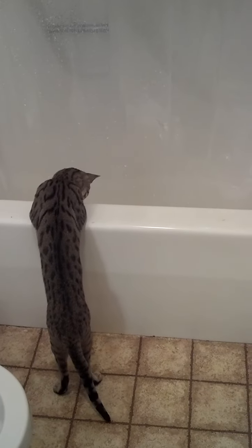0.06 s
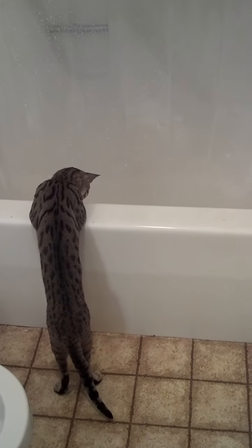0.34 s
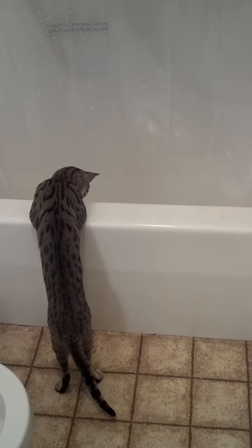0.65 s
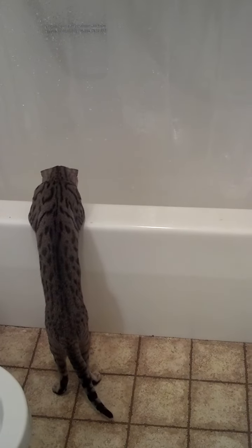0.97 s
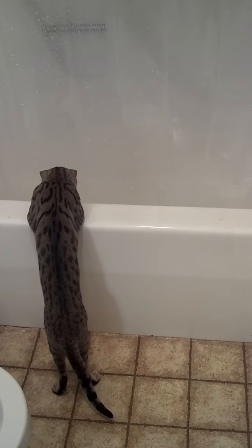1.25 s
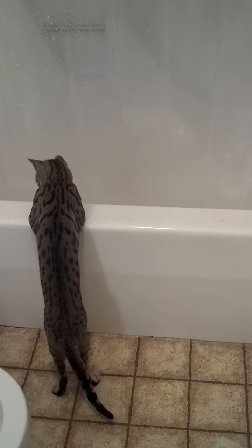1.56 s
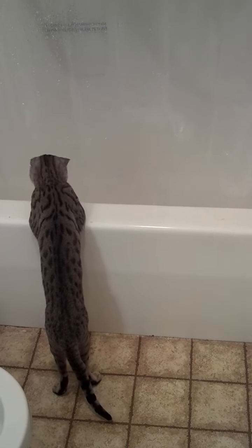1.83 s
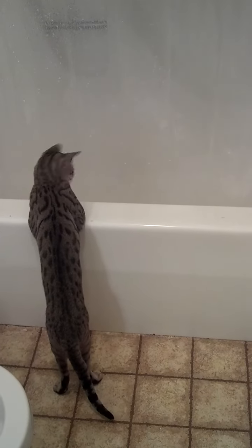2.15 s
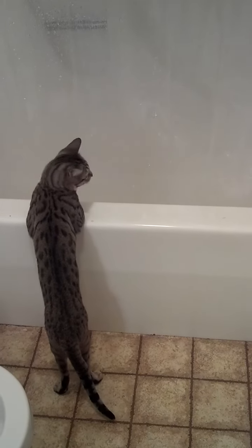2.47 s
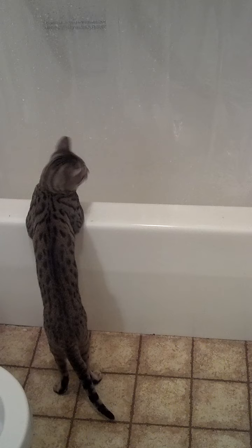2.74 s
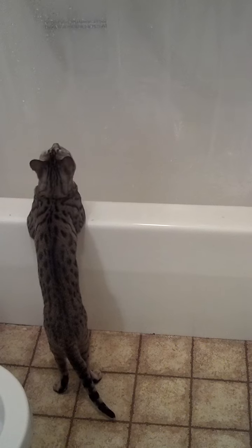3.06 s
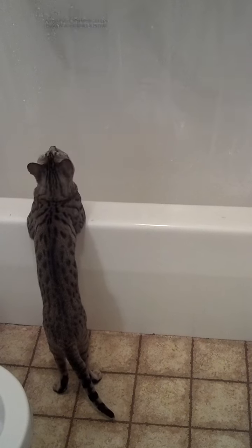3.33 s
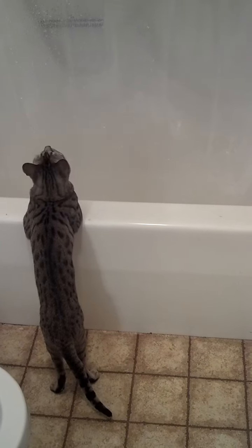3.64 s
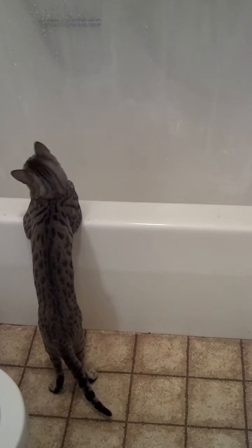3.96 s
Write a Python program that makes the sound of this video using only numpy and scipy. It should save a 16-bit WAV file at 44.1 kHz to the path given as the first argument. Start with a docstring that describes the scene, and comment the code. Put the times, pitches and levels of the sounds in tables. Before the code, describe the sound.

A shower runs into a bathtub for the whole four seconds, a bright, slightly wavering hiss over the patter and low drumming of drops. Brief, light splashes come irregularly from about 0.4 seconds on. Heavier dollops land with soft hollow thuds from about 0.8 seconds, strongest between 1.8 and 2.6 seconds. The tub and small tiled bathroom add a short, low ring.

```python
"""A shower runs into a tub in a small tiled bathroom. Its drops strike at random, a shot noise that
hisses and patters as the stream shifts. Now and then water slaps down or a heavier dollop drums the
tub floor, and the impacts drive the low resonances of tub and room. A phone hears it all through
two microphone ports and widens the stereo image."""
import sys
import numpy as np
from scipy import signal
from scipy.fft import rfft, irfft
from scipy.io import wavfile
from scipy.ndimage import uniform_filter1d

SR = 44100
rng = np.random.default_rng(int(sys.argv[2]) if len(sys.argv) > 2 else 0)


def digitize_waveform(pressure):
    """Quantize a signal to 16-bit integers and store it at the path in sys.argv[1].

    Rows of a 2-D input are taken as channels; values are limited to [-1, 1].
    """
    field = np.atleast_2d(pressure).T
    bounded = np.clip(field, -1, 1)
    quanta = np.round(bounded * 32767).astype(np.int16)
    wavfile.write(sys.argv[1], SR, quanta)


N = 176400
FLICKER_HZ = 50.65


def spray(mist_share=0.4):
    """Shot noise: fine drops tick in a mist so dense that it merges into a Gaussian hiss."""
    # spectrum of the hiss: f/Hz, level/dB
    hiss_spectrum = [(600,-100),(1900,-84),(2400,-82.3),(3300,-79.7),(4100,-82),(4900,-78.8),(5700,-80.2),(6900,-79.5),(8400,-77.5),(9600,-78.1),(11000,-77.2),(12400,-75.6),(14000,-73.3),(14600,-72.8),(15200,-69.5)]
    ticks = tiles(drops(per_s=5000, spread_db=1))
    mist = rng.standard_normal((2, N))
    hiss = np.sqrt(1 - mist_share) * ticks + np.sqrt(mist_share) * mist
    return colour(hiss * flow(follow=0.85, column=2) * flicker(depth_db=1.17), hiss_spectrum)


def tub(per_s=2500, spread_db=1.5):
    """Impact excitation: larger drops patter on the tub and drum its floor; dollops thud and scatter."""
    # spectrum of the patter: f/Hz, level/dB
    patter_spectrum = [(150,-87),(400,-79.5),(650,-78.5),(1000,-77.5),(1150,-82),(1430,-76),(1630,-78.5),(1850,-80.5),(2600,-130),(5000,-105),(16000,-120)]
    # spectrum of the drumming floor: f/Hz, level/dB
    drum_spectrum = [(25,-103),(70,-102),(98,-76.5),(130,-77.5),(200,-75.5),(300,-73),(355,-74.5),(440,-72),(520,-78),(750,-89.5),(1200,-101),(3000,-120)]
    patter = tiles(drops(per_s, spread_db)) * flow(follow=1.05, column=1) * flicker(depth_db=0.5)
    drum = drops(per_s, spread_db) * flow(follow=1, column=1)
    steady = colour(patter, patter_spectrum) + colour(drum, drum_spectrum)
    return resonate(steady + dollops(per_s, spread_db))


def dollops(per_s, spread_db):
    """Impulse response: each dollop gives the tub floor one push, a hollow thud, and scatters drops."""
    # landings: t/s, level/dB
    landings = [(.765,2.5),(0.864,4),(.98,2),(1.19,2),(1.289,0),(1.8,5.5),(1.989,4.5),(2.196,8),(2.595,5),(2.825,2.5),(3.165,4),(3.57,-10),(3.93,-1.5)]
    # spectrum of the thud: f/Hz, level/dB
    thud_spectrum = [(250,-110),(350,-93),(450,-89),(540,-112),(1000,-150)]
    # spectrum of the scattered drops: f/Hz, level/dB
    scatter_spectrum = [(60,-102),(160,-82.5),(280,-84),(370,-81),(450,-72),(540,-87.5),(800,-84),(1400,-99.5),(2200,-77),(5000,-120)]
    pushes = np.zeros(N)
    for start, db in landings:
        pushes[int(start * SR)] += undb(db) * np.sqrt(SR)
    scatter = drops(per_s, spread_db) * bursts(landings, attack_s=0.0072, decay_s=0.088)
    return colour(scatter, scatter_spectrum) + colour(pushes, thud_spectrum)


def splashes():
    """Transient shot noise: each slap of water throws up a short, dense shower of droplets."""
    # slaps: t/s, level/dB
    slaps = [(.397,-9),(.458,-2),(.65,-6.5),(.782,-13),(.95,-5.5),(1.217,-4.5),(1.585,-11),(1.803,-19),(2.142,-7),(2.382,-7.5),(2.547,-8),(2.712,-4),(3.172,-12),(3.42,-4.5),(3.732,-21),(3.902,-4.5)]
    # bright spectrum of the droplets: f/Hz, level/dB
    splash_spectrum = [(500,-84),(2000,-124),(5000,-70),(8000,-68.5),(11000,-70.5),(15500,-78)]
    droplets = drops(per_s=12000, spread_db=-3.5) * bursts(slaps, attack_s=0.0049, decay_s=0.027)
    return colour(tiles(droplets), splash_spectrum)


def drops(per_s, spread_db):
    """Poisson impacts, exponentially distributed in level: two independent streams of unit power."""
    hit = rng.random((2, N)) < per_s / SR
    size = undb(spread_db * np.minimum(rng.exponential(size=(2, N)), 5))
    impacts = hit * size * np.sign(rng.standard_normal((2, N)))
    return impacts / impacts.std()


def flow(follow, column):
    """Slow amplitude modulation by the shifting stream; follow scales its swing in dB."""
    # strength of the falling water: t/s, patter level/dB, hiss level/dB
    strength = [(0.0, -2, -3), (0.12, -2.3, -5), (0.25, 0.5, -2), (0.35, -0.5, -3.5), (0.42, -0.5, -1),
                (0.58, -1, -2.5), (0.71, 0.5, -3), (0.76, 2.5, -1), (0.98, 1, 0), (1.08, 1, -2.5),
                (1.34, 2.5, 0), (1.45, -1, -3), (1.58, -0.5, -1.5), (1.72, -0.5, -3.5), (1.81, 0.5, -1),
                (1.86, -3.5, -4.5), (1.91, 1, -0.5), (2.08, -1.5, -3.5), (2.22, 1, -1.5), (2.38, -1.5, -2),
                (2.43, -2.5, -5.5), (2.5, 0, -1.5), (2.64, -1, -4), (2.75, -0.5, -0.5), (2.88, -0.5, -2.5),
                (3.16, -0.5, -1), (3.26, -0.5, -4), (3.38, -0.5, -2.5), (3.45, 0.9, -1), (3.58, 2, -0.5),
                (3.66, 1.5, -1.5), (3.72, 0, -0.5), (3.78, -2.5, -6), (4.0, -1.5, -2)]
    rows = np.array(strength)
    return undb(follow * np.interp(times(), rows[:, 0], rows[:, column]))


def flicker(depth_db):
    """Fast amplitude modulation: the level glides between random values, depth_db in RMS."""
    hold = int(SR / FLICKER_HZ)
    steps = rng.standard_normal(N)[np.arange(N) // hold]
    glide = uniform_filter1d(steps, hold)
    return undb(depth_db * glide / glide.std())


def bursts(events, attack_s, decay_s):
    """Incoherent summation: envelopes of linear rise and exponential decay add in power."""
    power = np.zeros(N)
    for start, db in events:
        age = np.maximum(times() - start, 0)
        rise = np.minimum(age / attack_s, 1)
        fall = np.exp(-np.maximum(age - attack_s, 0) / decay_s)
        power += (undb(db) * rise * fall) ** 2
    return np.sqrt(power)


def resonate(x):
    """Modal resonance: a minimum-phase filter rings with one Lorentzian peak for each mode."""
    # modes of tub and room: f/Hz, bandwidth/Hz, boost/dB (sign ignored)
    modes = [(101.4,6,7.5),(167.4,13,11.5),(218,6,2.5),(237.3,9.9,10),(303,8,3),(354.8,6.9,8.5),(387.3,20,7.5),(436,4.3,5.5),(450.6,10.5,9),(554,23,2.5),(570,18,5.5),(637.5,17,7.5),(726.5,15,7),(816.5,13.4,7),(922,19,3.5),(995.6,9.9,6.5),(1120,17,6),(1202,27,6.5),(1278,4.7,5.5),(1345,12,7),(1420,27,2.5),(1603,8.2,7),(1670,8,6),(1803,12,-0.5)]
    power = 1 + sum((undb(abs(db)) ** 2 - 1) / (1 + (2 * (bins() - hz) / width) ** 2)
                    for hz, width, db in modes)
    cepstrum = irfft(np.log(power), N)
    causal = np.concatenate([cepstrum[:1] / 2, cepstrum[1:N // 2]])
    return irfft(rfft(x) * np.exp(rfft(causal, N)), N)


def tiles(x, t60_s=0.14, tail_re_direct_db=-4):
    """Reverberation: the tiled room smears each impact into a diffuse tail, conserving power."""
    retained = np.exp(-2 * np.log(1000) / (t60_s * SR))
    energy = signal.lfilter([1 - retained], [1, -retained], (x ** 2).mean(axis=0))
    tail_gain = undb(tail_re_direct_db)
    tail = tail_gain * np.sqrt(energy) * rng.standard_normal((2, N))
    return (x + tail) / np.hypot(1, tail_gain)


def ports(x):
    """Spatial coherence: two ports in a reverberant field agree in the bass, hardly in the high treble."""
    # likeness of the ports: f/Hz, correlation (clipped to +-1)
    correlation = [(100,0.97),(250,0.98),(440,0.82),(540,.42),(700,0.54),(900,0.75),(1200,1),(1600,-0.033),(1850,-0.51),(2250,-0.87),(2550,-1.1),(3000,-1),(3250,.3),(4200,0.062),(5600,-0.15),(14000,0.26)]
    # lead of the left port on the tub's ring: f/Hz, phase/rad
    left_lead = [(150,0),(300,.04),(430,.14),(530,.6),(750,.35),(1200,0)]
    alike = np.clip(curve(correlation), -1, 1)
    mid, side = rfft(x) * np.sqrt(np.array([1 + alike, 1 - alike]) / 2)
    half_lead = np.exp(0.5j * curve(left_lead))
    return irfft(np.array([(mid + side) * half_lead, (mid - side) / half_lead]), N)


def colour(x, spectrum):
    """Linear filtering: white input of unit power takes on the given spectral density."""
    return irfft(rfft(x) * undb(curve(spectrum)) * np.sqrt(SR / 2), N)


def curve(points):
    """Interpolation of (f/Hz, value) points to every bin, on a log-frequency axis."""
    hz, value = np.array(points, float).T
    return np.interp(np.log(bins() + 1), np.log(hz), value)


def undb(db):
    """Amplitude ratio for a level/dB."""
    return 10 ** (np.asarray(db) / 20)


def times():
    """t/s of every sample."""
    return np.arange(N) / SR


def bins():
    """f/Hz of every spectral bin."""
    return np.arange(N // 2 + 1) * SR / N


def scene():
    """Superposition: the sounds of the water add at the two ports."""
    return ports(spray() + splashes() + tub())


def record(dry, delay_s=0.000363, cutoff_hz=15720):
    """Antiphase crossfeed widens the image: each channel loses a delayed copy of the other; then a low-pass."""
    channels = rfft(dry)
    crossfeed = np.exp(-2j * np.pi * bins() * delay_s) * channels[::-1]
    wide = irfft(channels - crossfeed, N)
    low_pass = signal.ellip(12, 0.2, 80, cutoff_hz, fs=SR, output="sos")
    return signal.sosfilt(low_pass, wide)


dry = scene()
out = record(dry)
digitize_waveform(out)
```